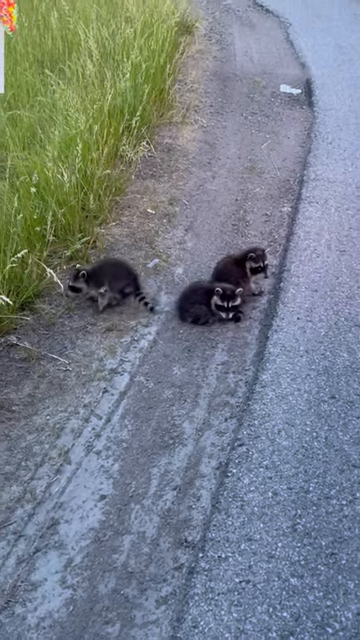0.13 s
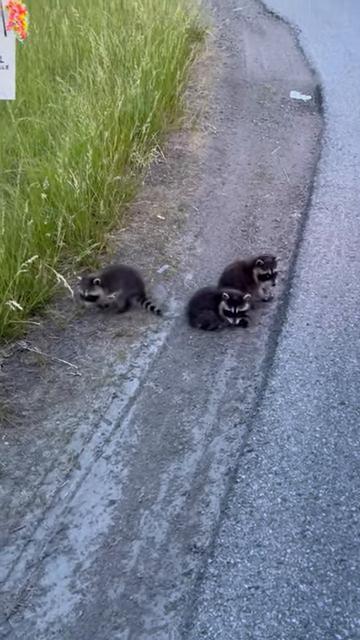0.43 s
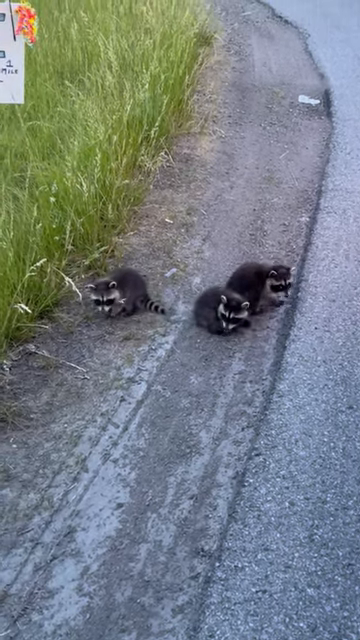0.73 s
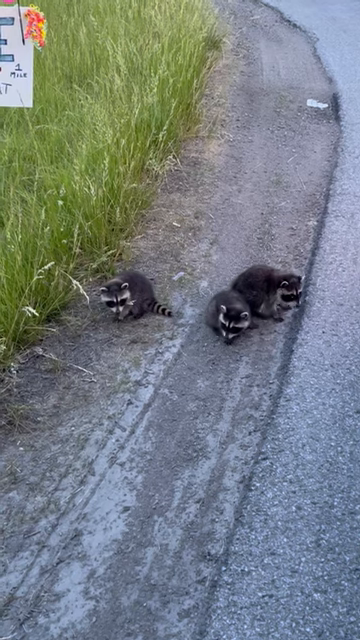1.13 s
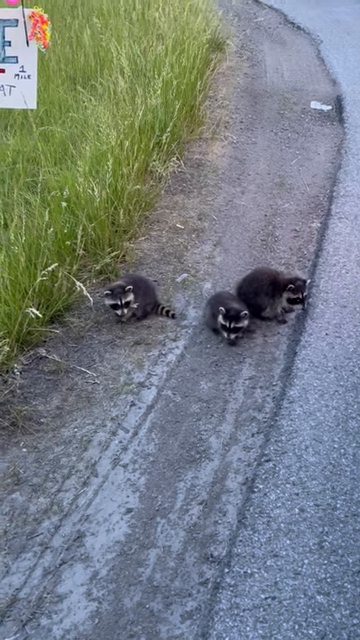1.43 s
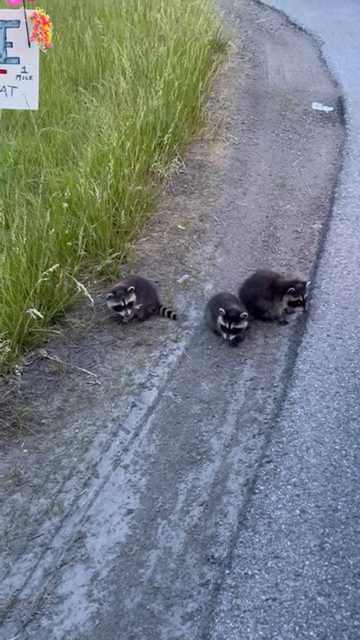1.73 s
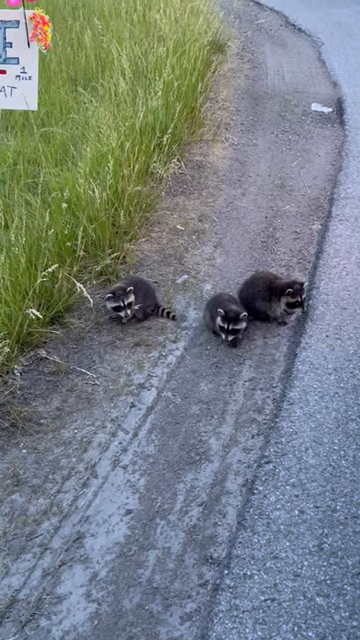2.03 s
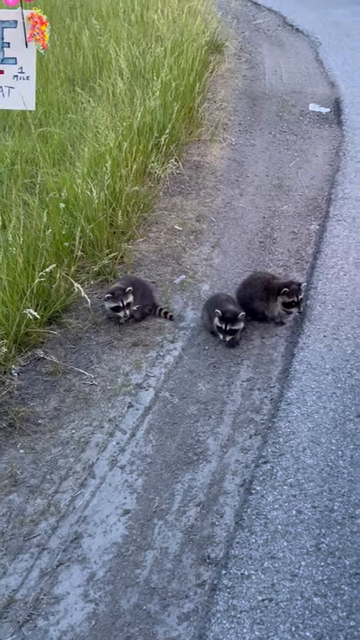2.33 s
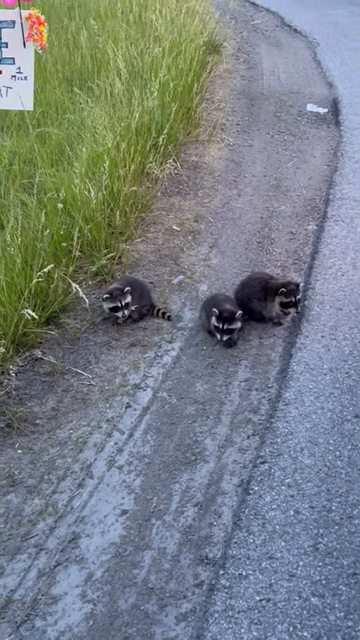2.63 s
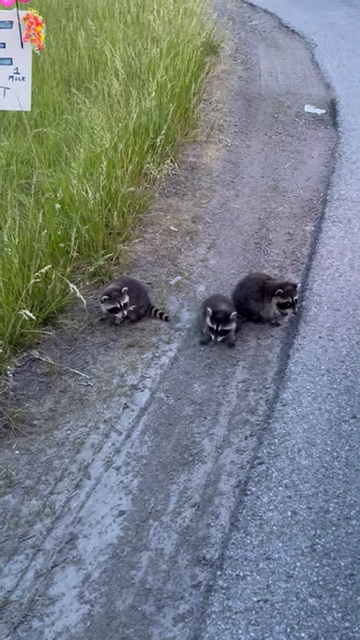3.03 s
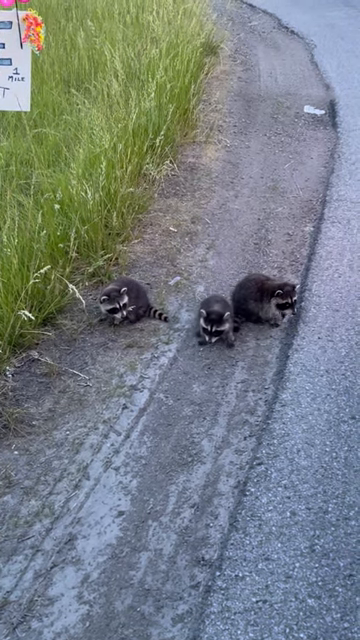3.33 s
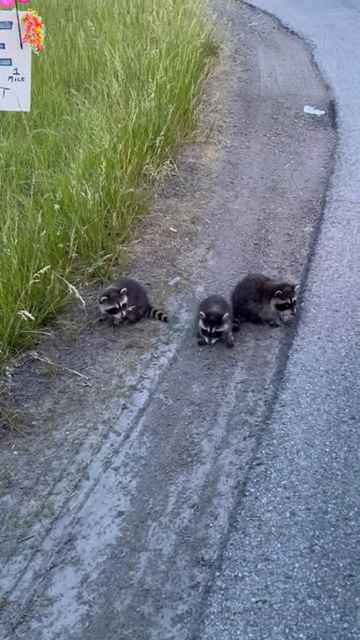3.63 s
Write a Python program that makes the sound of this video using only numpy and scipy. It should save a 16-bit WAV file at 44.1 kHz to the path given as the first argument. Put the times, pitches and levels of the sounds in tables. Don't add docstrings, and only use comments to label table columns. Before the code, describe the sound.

Young raccoons give rapid, high, rough trills on a road verge, with quiet muttering between, while a heavy lorry slows away and a car idles; wheel thumps and a late tyre whirr follow, picked up outdoors in stereo.

```python
import sys
import numpy as np
from scipy import signal
from scipy.fft import rfft, irfft, next_fast_len
from scipy.io import wavfile
from scipy.ndimage import uniform_filter1d

SR = 44100
rng = np.random.default_rng(int(sys.argv[2]) if len(sys.argv) > 2 else 0)


def generate_wav(sig):
    pcm = np.round(np.clip(np.atleast_2d(sig).T, -1, 1) * 32767).astype(np.int16)
    wavfile.write(sys.argv[1], SR, pcm)


def volts_from_db(level):
    exponent = np.asarray(level, float) / 20
    return 10 ** exponent


N = 167139
EDGE_HZ = 15650


def read(points, x):
    f, value = np.transpose(points)
    return np.interp(np.log(x + 1), np.log(f + 1), value)


def evened(x):
    return x / np.sqrt(np.mean(x ** 2) + 1e-20)


def add(mix, start_s, sound):
    part = mix[max(round(start_s * SR), 0):][:len(sound)]
    part += sound[:len(part)]


def drift(rate, count):
    steps = int(N / SR * 40) + 3
    knots = rng.standard_normal((count, steps))
    at = np.clip(np.arange(N) / SR * rate, 0, steps - 2)
    k = at.astype(int)
    blend = .5 - .5 * np.cos(np.pi * (at % 1))
    return knots[:, k] * (1 - blend) + knots[:, k + 1] * blend


def resonate(x, hz, width_hz):
    turn = np.exp(2j * np.pi * np.cumsum(hz * np.ones(len(x))) / SR)
    r = np.exp(-np.pi * width_hz / SR)
    return 2 * (turn * signal.lfilter([1 - r], [1, -r], x / turn + 1e-18)).real


# (time [s], firing-pair rate [Hz], engine level [dB], tyre roar level [dB])
LORRY = [
    (0, 33.92, -31, -43.5),
    (0.499, 32.67, -30.5, -43),
    (1.001, 30.83, -29, -44.5),
    (1.5, 29.27, -31, -45),
    (2.049, 26.74, -34.5, -46.5),
    (3.348, 26.75, -33, -47.5),
    (3.79, 25.51, -34, -48),
]


def lorry_control(column, t):
    rows = np.array(LORRY)
    return np.interp(t, rows[:, 0], rows[:, column])


# (frequency [Hz], level [dB per Hz])
RUMBLE = [(18, -71), (30, -63), (55, -58), (80, -54), (105, -62.5), (170, -60), (290, -67.5), (500, -99)]
# (frequency [Hz], level [dB per Hz])
ROAR = [(300, -76), (500, -79), (1000, -78.5), (1400, -82), (1800, -87), (2500, -92.5), (3500, -96.5),
        (9000, -135)]
# (frequency [Hz], level [dB per Hz])
HISS = [(2000, -104), (4000, -102), (6000, -106), (8000, -111), (10300, -113), (12000, -119), (13800, -122),
        (15200, -123)]
# (time [s], level [dB])
ONCOMING = [
    (2.3, -67),
    (2.9, -50),
    (3.4, -39),
    (3.79, -46),
]
# (frequency [Hz], likeness [0 to 1])
SAME = [(120, 1), (330, .9), (520, .75), (860, .55), (1600, .65), (2200, .91), (4600, .94), (5700, .998)]


def road():
    hop, size = 512, 2048
    frames, hz = N // hop + 5, np.fft.rfftfreq(size, 1 / SR)
    a, b, c, d, patches = rng.standard_normal((frames, len(hz), 5)).T
    patches_db = evened(uniform_filter1d(uniform_filter1d(patches, 20, 0), 8, 1))
    t = np.arange(frames) * hop / SR
    f = hz[:, None]
    near_db = lorry_control(3, t) + 47
    rumble = volts_from_db(read(RUMBLE, f) - 99 * (f > 500))
    roar = volts_from_db(read(ROAR, f) + near_db) * (f > 200)
    hiss = volts_from_db(read(HISS, f) + .83 * near_db) * ((f > 1500) & (f < 15100))
    whirr = volts_from_db(np.interp(t, *np.transpose(ONCOMING)) - 36.5) / (1 + ((f - 1091) / 140) ** 4)
    level = np.sqrt(rumble ** 2 + roar ** 2 + hiss ** 2 + whirr ** 2)
    same = np.clip(read(SAME, f), 0, 1)
    right = a + 1j * b
    left = same * right + np.sqrt(1 - same ** 2) * (c + 1j * d)
    z = np.array([left, right]) * level * volts_from_db(patches_db)
    return 6.1 * signal.istft(z, nperseg=size, noverlap=size - hop)[1][:, :N]


# (multiple of the idle rate, level [dB])
IDLE = [(3, -43), (4, -42), (5, -43), (6, -42), (24, -52), (31, -59)]


def idling_car():
    idle_hz, waver_db = 12.4, 2
    waver, luck = drift(5.02, len(IDLE)), rng.standard_normal(len(IDLE))
    t, out = np.arange(N) / SR, np.zeros(N)
    for j, (multiple, db) in enumerate(IDLE):
        tone = np.cos(2 * np.pi * multiple * idle_hz * t + 9 * luck[j])
        out += volts_from_db(db + waver_db * waver[j]) * tone
    return np.sqrt(2) * out


# (frequency [Hz], level [dB])
PIPE = [(90, -24), (125, -10), (143, -6), (161, 0), (180, -6), (215, -11), (245, -19), (330, -27)]


def lorry_engine():
    odd_db, scatter_db, waver_db, wobble = -7, 1.0, 1.3, .007
    t = np.arange(N) / SR
    hz = uniform_filter1d(lorry_control(1, t), 4000) / 2 * (1 + wobble * drift(9, 1)[0])
    turns = np.cumsum(hz) / SR
    waver, luck = drift(5.02, 30), rng.standard_normal((30, 2))
    out = np.zeros(N)
    for k in range(6, 25):
        db = read(PIPE, k * hz) + odd_db * (k % 2) + scatter_db * luck[k, 0] + waver_db * waver[k]
        out += volts_from_db(db) * np.cos(2 * np.pi * k * turns + 9 * luck[k, 1])
    return np.sqrt(2) * out * volts_from_db(lorry_control(2, t))


# (time [s], level [dB], pitch [Hz])
THUMPS = [
    (.895, -20.5, 62),
    (1.103, -18.5, 58.3),
    (1.51, -23.5, 57.8),
    (1.83, -25, 75.2),
    (2.11, -19, 63.9),
    (2.73, -22, 65.8),
]


def thumps():
    rise_s, t60_s, sag = .014, .2, .3
    out, t = np.zeros(N), np.arange(SR // 3) / SR
    for s, db, hz in THUMPS:
        phase = 2 * np.pi * np.cumsum(hz * (1 + sag * np.exp(-t / .021))) / SR
        rise = 1 - np.exp(-(t / rise_s) ** 2)
        add(out, s, volts_from_db(db - 60 * t / t60_s) * 2 * rise * np.sin(phase))
    return out


# (time [s], length [s], level [dB], start pitch [Hz], end
# pitch [Hz])
RUSTLES = [
    (1.78, .15, -71.5, 11800, 9000),
    (2.9, .07, -69.5, 7100, 6000),
    (2.9, 0.24, -69, 7500, 6000),
    (3.3, .2, -68, 6500, 6000),
    (2.4, 0.081, -77, 10200, 10000),
    (1.5, .06, -70, 7500, 6500),
    (.055, .02, -73, 10000, 10000),
    (.305, .012, -71, 14000, 13000),
    (.323, .008, -69.5, 13000, 13000),
    (1.372, .014, -70, 14000, 14000),
]


def rustles():
    width_hz = 2200
    out = np.zeros(N)
    for s, length_s, db, start_hz, end_hz in RUSTLES:
        u = np.linspace(0, 1, round(length_s * SR))
        hz = start_hz + (end_hz - start_hz) * u
        noise = rng.standard_normal(len(u))
        brush = evened(resonate(resonate(noise, hz, width_hz), hz, width_hz))
        add(out, s, volts_from_db(db) * np.sin(np.pi * u) ** .92 * brush)
    return out


# (time [s], length [s], level [dB], start pitch [Hz], end pitch [Hz])
WHINES = [(.128, .03, -65, 4150, 4150), (.152, .018, -59, 4150, 3900), (.148, .02, -71, 5300, 5000),
          (2.575, .045, -71, 4300, 4100), (2.832, .03, -70, 5250, 5200), (2.96, .06, -77, 6750, 6700),
          (2.91, .21, -82, 10700, 10600), (2.97, .085, -75.5, 7400, 7380), (3.0, .16, -74.5, 5300, 5250),
          (3.322, .045, -69.5, 5350, 4900), (3.452, .03, -70, 5300, 5050), (3.505, .11, -71, 5350, 5200),
          (3.515, .05, -74, 5800, 5600), (3.385, .05, -75, 5250, 5200), (3.635, .014, -67, 5100, 5000)]


def whines():
    fuzz, width_hz = 1.2, 200
    out = np.zeros(N)
    for s, length_s, db, start_hz, end_hz in WHINES:
        u = np.linspace(0, 1, max(round(length_s * SR), 9))
        hz = start_hz + (end_hz - start_hz) * u ** 2
        noise = rng.standard_normal(len(u))
        breath = evened(resonate(resonate(noise, hz, width_hz), hz, width_hz))
        tone = np.sin(2 * np.pi * np.cumsum(hz) / SR) + fuzz * breath
        add(out, s, volts_from_db(db) * np.sin(np.pi * u) ** .5 * tone)
    return out


# (frequency [Hz], level [dB], time to fall 60 dB [s])
RELAY = [(6900, -3, .006), (8200, -6, .003), (9400, -2, .006), (11000, -5, .003), (12400, 0, .004),
         (13600, -1, .003), (15000, -2, .004)]


def relay():
    period_s, first_s, off_after_s, on_db, off_db = .674, .381, .357, -65, -75
    out, t = np.zeros(N), np.arange(1500) / SR
    ring = sum(volts_from_db(db - 60 * t / t60) * np.sin(2 * np.pi * hz * t) for hz, db, t60 in RELAY)
    for k in range(-1, 6):
        for delay_s, db in ((0, on_db), (off_after_s, off_db)):
            hits = rng.standard_normal(400) * (rng.random(400) < .15)
            bounce = .8 * hits * np.exp(-np.arange(400) / 260)
            bounce[0] = 1
            at = first_s + k * period_s + delay_s
            if at > 0:
                add(out, at, volts_from_db(db) * np.convolve(ring, bounce))
    return out


def trill(pulses, throat, length_s, glide, rough, lift):
    jitter, breathiness, upper_hz = .024, 1.7, 6860
    out, t = np.zeros(N), np.arange(round(.036 * SR)) / SR
    freq = np.fft.rfftfreq(len(t), 1 / SR)
    luck = rng.standard_normal((len(pulses), 4, len(t)))
    first_s, last_s = pulses[0][0], pulses[-1][0]
    for (s, db, hz, *upper_db), (a, b, c, d) in zip(pulses, luck):
        u = t / (length_s * (1 + .1 * np.tanh(a[0])))
        wander = jitter * rough * evened(uniform_filter1d(a, 120))
        pitch = hz / 4 * (1 + glide * (u - .4) + wander)
        turns = np.cumsum(pitch) / SR
        stretch = 1 + lift * ((s - first_s) / (last_s - first_s)) ** 2

        def shape(f):
            upper = read(throat, f / stretch) + sum(upper_db)
            lower = read(throat, f * throat[1][0] / hz)
            return volts_from_db(np.where(f > upper_hz, upper, lower))

        voice = sum(shape(k * hz / 4) * np.cos(2 * np.pi * k * turns + 3 * b[k]) for k in range(3, 12))
        breath = irfft(rfft(c) * shape(freq) * (freq < EDGE_HZ), len(t))
        flutter = 1 + rough * evened(uniform_filter1d(uniform_filter1d(d, 50), 30))
        tail = .16 * np.exp(-t / .0097) * np.minimum(t / .003, 1)
        env = np.sin(np.pi * np.clip(u, 0, 1) ** .78) ** 2 + tail
        burst = env * (flutter * voice + breathiness * rough * breath)
        burst *= np.linalg.norm(env * voice) / np.linalg.norm(burst)
        add(out, s - .003, volts_from_db(db) * burst)
    return out


# (time [s], peak level [dB], fourth harmonic [Hz])
FIRST = [
    (0.1808, -53.5, 4130),
    (0.2097, -49, 4190),
    (0.2414, -50, 4280),
    (0.275, -50, 4180),
    (0.308, -48, 4220),
    (0.3474, -48, 4260),
    (0.383, -47, 4370),
]
# (time [s], peak level [dB], fourth harmonic [Hz], upper throat level [dB])
SECOND = [(0.9114, -64, 4120, -20.5), (0.9488, -47, 4240, -20.5), (0.991, -45.5, 4330, -23.5),
          (1.0315, -47.5, 4330, -18.5), (1.0757, -46.5, 4240, -19.5), (1.1143, -45, 4455, -18.5),
          (1.1567, -48.5, 4440, -16.5), (1.1976, -48.5, 4430, -13.5), (1.2394, -48, 4480, -12.5),
          (1.28, -46.5, 4360, -15.5), (1.3254, -49.5, 4330, -18), (1.3757, -50.5, 4050, -14)]
# (time [s], peak level [dB], fourth harmonic [Hz])
MUTTER = [
    (1.432, -59.5, 4500),
    (1.492, -63, 4400),
    (1.55, -62, 4450),
    (2.232, -62, 4430),
    (2.292, -63, 4300),
    (2.338, -60.5, 4500),
]
# (time [s], peak level [dB], fourth harmonic [Hz], upper throat level [dB])
THIRD = [(2.034, -56, 4350, 9), (2.092, -57, 4100, 0), (2.476, -58, 4380, 6.5), (2.522, -58.5, 4560, 8.5),
         (2.567, -56, 4560, 5.5), (2.615, -55.5, 4320, 6), (2.659, -53, 4550, -1.5), (2.706, -56, 4580, 1),
         (2.752, -55.5, 4260, 5), (2.798, -55.5, 4400, -4), (2.855, -55, 4400, -6.5),
         (2.915, -56.5, 4200, -1)]
# (frequency [Hz], level [dB])
THROAT_A = [(3100, -28), (4200, 0), (5200, -13), (6350, -9), (7400, -22), (9000, -34), (14000, -30)]
# (frequency [Hz], level [dB])
THROAT_B = [(3200, -28), (4300, 0), (5400, -26), (6500, -17), (7200, -9), (7900, 10.5), (9300, -12),
            (12500, -7.5)]
# (frequency [Hz], level [dB])
THROAT_C = [(3300, -18), (4500, -6.5), (5650, -2), (6800, -24), (8000, -15), (8700, -32), (12000, -35)]


def raccoon_kits():
    first = trill(FIRST, THROAT_A, length_s=.016, glide=.09, rough=.7, lift=0)
    second = trill(SECOND, THROAT_B, length_s=.013, glide=-.09, rough=.55, lift=.1)
    mutter = trill(MUTTER, THROAT_A, length_s=.015, glide=-.03, rough=.6, lift=.03)
    third = trill(THIRD, THROAT_C, length_s=.015, glide=-.03, rough=.6, lift=.03)
    return first + second + mutter + third


def scene():
    vehicles = idling_car() + lorry_engine() + thumps()
    return road() + vehicles + rustles() + whines() + relay() + raccoon_kits()


# (from [Hz], to [Hz], dropped part [0 sum, 1 difference])
LOCKED = [(5680, 6230, 0), (7600, 8550, 1), (9650, 10950, 0), (11650, 13100, 1), (13970, 15700, 0)]


def locked(pair):
    unlock_db, low_edge_hz, high_edge_hz = 5, 7500, 10000
    sum_and_difference = np.array([pair[0] + pair[1], pair[0] - pair[1]]) / 2
    hz, _, z = signal.stft(sum_and_difference, SR, nperseg=1024)
    power = (abs(z[:, (hz > low_edge_hz) & (hz < high_edge_hz)]) ** 2).sum((0, 1))
    loud = power > np.median(power) * volts_from_db(unlock_db) ** 2
    for low_hz, high_hz, part in LOCKED:
        z[part, (hz > low_hz) & (hz < high_hz)] *= loud
    both, apart = signal.istft(z, SR, nperseg=1024)[1][:, :N]
    return np.array([both + apart, both - apart])


# (frequency [Hz], level [dB])
BALANCE_DB = [(480, 0), (690, 3), (1030, 3.5), (1400, 5), (1720, 5.6), (2070, 2.7), (2300, .5), (2600, 0)]
# (frequency [Hz], phase [radians])
LEAD = [(50, 0), (170, -.2), (400, -.3), (850, -.8), (1700, -.1), (2580, 2.15), (3950, .95), (5170, 1.95)]


def microphone_pair(dry):
    lead_s = 2.33e-4
    size = next_fast_len(N + 4096)
    hz = np.fft.rfftfreq(size, 1 / SR)
    lead = np.interp(hz, *np.transpose(LEAD)) + 2 * np.pi * lead_s * np.maximum(hz - LEAD[-1][0], 0)
    left = volts_from_db(read(BALANCE_DB, hz)) * np.exp(1j * lead)
    pair = np.array([left, np.ones(len(hz))]) * (hz < EDGE_HZ)
    padded = np.pad(dry, ((0, 0), (2048, size - N - 2048)), "reflect")
    return irfft(rfft(padded) * pair, size)[:, 2048:][:, :N]


def band_limit(x):
    return signal.sosfilt(signal.butter(12, 15650, fs=SR, output="sos"), x)


def record(dry):
    mix = locked(microphone_pair(dry))
    return band_limit(mix)


dry = scene()
out = record(dry)
generate_wav(out)
```